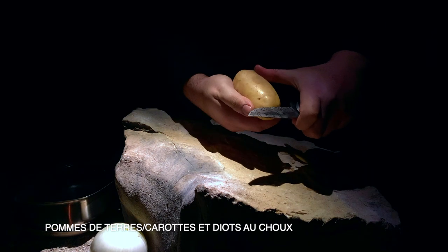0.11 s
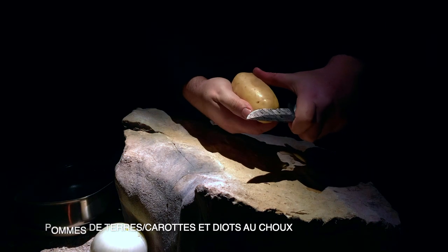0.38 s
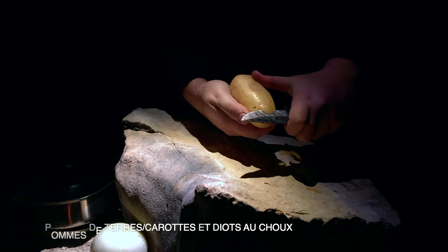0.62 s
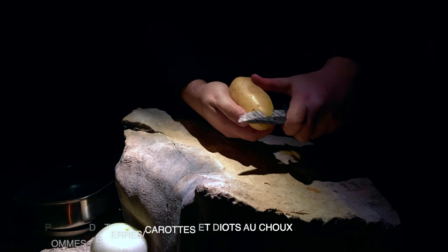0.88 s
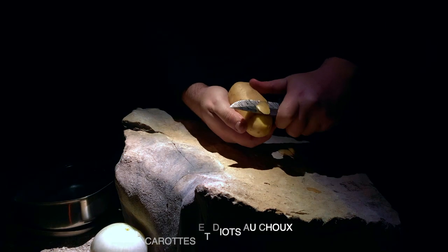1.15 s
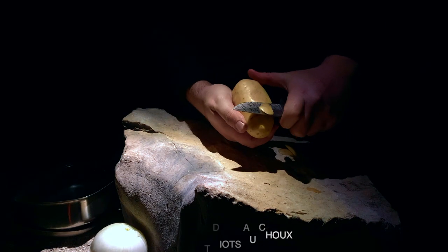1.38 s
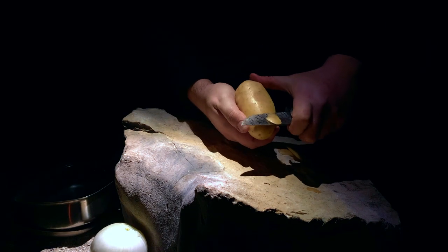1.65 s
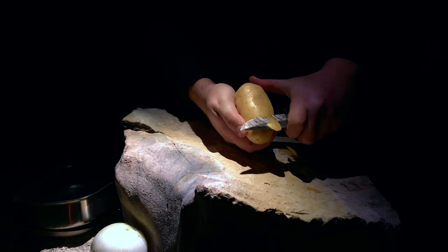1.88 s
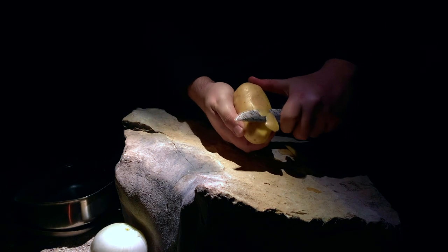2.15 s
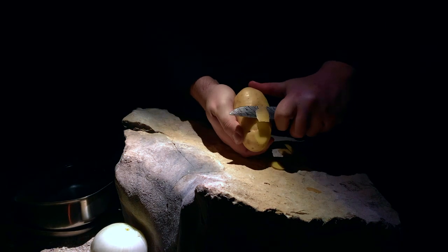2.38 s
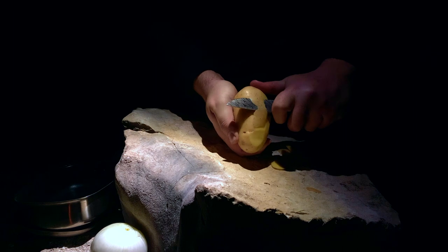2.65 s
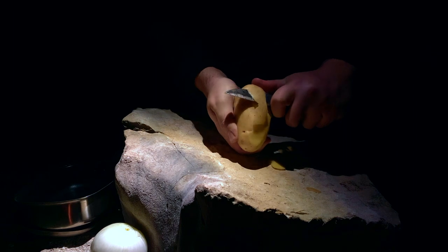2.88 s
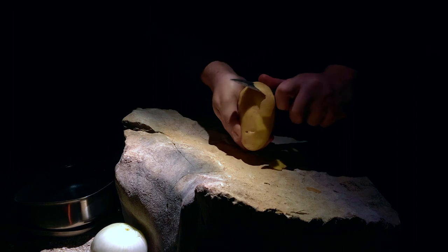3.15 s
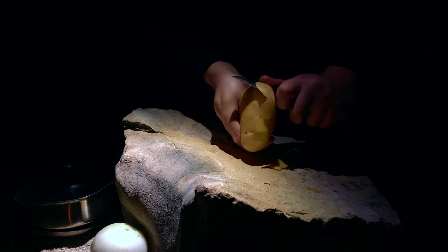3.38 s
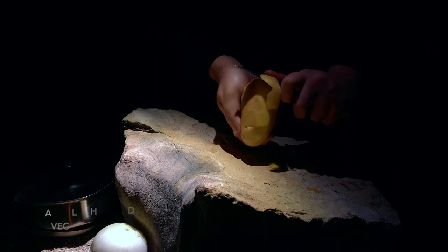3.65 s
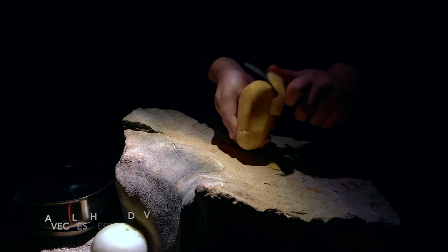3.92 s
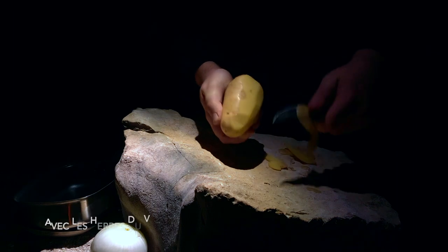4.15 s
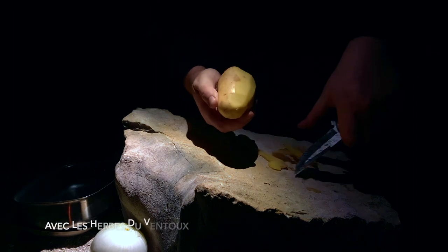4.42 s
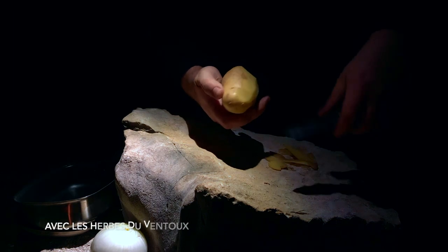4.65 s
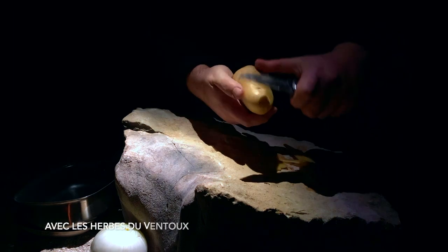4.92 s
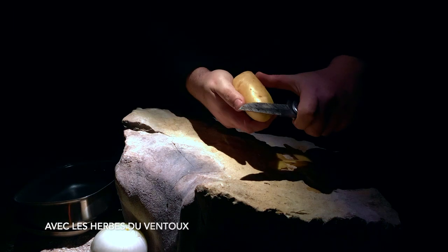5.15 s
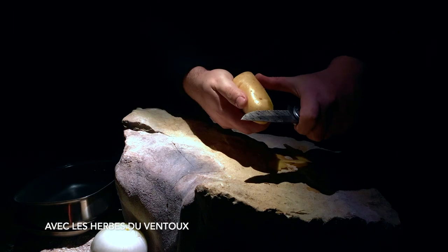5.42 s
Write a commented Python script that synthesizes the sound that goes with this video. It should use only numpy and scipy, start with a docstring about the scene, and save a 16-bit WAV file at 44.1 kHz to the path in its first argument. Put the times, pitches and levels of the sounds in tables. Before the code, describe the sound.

Close outdoor potato peeling: a hard crack at one second, quick stuttering blade scrapes, scattered clicks, low wind buffeting and faint hiss.

```python
"""Peeling a raw potato outdoors

A small knife peels a raw potato: the blade sticks and slips in short wet scrapes, made of tiny ruptures
that ring the knife, potato and hands. Short noise bursts make dry clicks and two sharp snaps, which a
nearby wall throws back. Shaped noise and slow waves make the wind rumbling over the microphone, narrow
noise bands its moans and a faint distant whistle. Gain control dips after the loudest peaks."""
import sys
import numpy as np
from scipy import signal
from scipy.fft import rfft
from scipy.io import wavfile
from scipy.ndimage import uniform_filter1d

SR = 44100
rng = np.random.default_rng(int(sys.argv[2]) if len(sys.argv) > 2 else 0)


def nominal_scale(level):
    """Amplitude ratio for a level in decibels (scalar or array-like)."""
    x = np.asarray(level, float) / 20
    return 10 ** x


def output_pcm(signal):
    """Save a mono or channel-first signal as 16-bit PCM at the path in sys.argv[1].

    Samples are clipped to [-1, 1] before scaling.
    """
    pcm = np.clip(np.atleast_2d(signal).T, -1, 1) * 32767
    wavfile.write(sys.argv[1], SR, np.round(pcm).astype(np.int16))


N = 244314
T = np.arange(N) / SR
HZ = np.fft.rfftfreq(4096, 1 / SR)

# Four pitch ranges from dull to sharp. Each row: lower edge in Hz, upper edge in Hz.
REGISTERS = [(1000, 2800), (2800, 5500), (5500, 10500), (10500, 15500)]
# Resonances of knife, potato and hands. Each row: pitch in Hz, width in Hz, relative strength in dB.
BODY = [(1250, 720, -1.5), (2010, 150, -6.5), (3000, 150, -6.5), (3680, 720, 5.5), (4690, 1100, 1),
        (6640, 290, -17), (7680, 1300, 4.5), (9300, 1200, 3.5), (10600, 2300, -7), (12400, 1300, -12.5),
        (14400, 3000, -13.5)]


def evened(x):
    """Scales a sound to an rms of 1."""
    return x / np.sqrt(np.mean(x ** 2) + 1e-20)


def read(points, hz):
    """Reads a table of (Hz, value) at any frequency, on a logarithmic pitch scale."""
    f, value = np.transpose(points)
    return np.interp(np.log(hz + 1), np.log(f + 1), value)


def curve(rows, t):
    """Draws straight lines in time through each column of a table that starts with seconds."""
    s, *columns = np.transpose(rows)
    return [np.interp(t, s, column) for column in columns]


def add(mix, s, sound):
    """Adds a sound to the mix from second s on."""
    part = mix[round(s * SR):][:len(sound)]
    part += sound[:len(part)]


def noise(field_db, size, patchy_db):
    """Random short-time spectra; field_db(hz, t) gives the level, drifting patches roughen it."""
    hop = size // 4
    hz = np.fft.rfftfreq(size, 1 / SR)
    frames = N // hop + 5
    a, b, patches = rng.standard_normal((frames, len(hz), 3)).T
    patches = uniform_filter1d(patches, size=5, axis=0)
    patches = evened(uniform_filter1d(patches, size=8, axis=1))
    t = np.arange(frames) * hop / SR
    level_db = field_db(hz[:, None], t[None]) + patchy_db * patches
    z = (a + 1j * b) * nominal_scale(level_db)
    return evened(signal.istft(z, nperseg=size, noverlap=size - hop)[1][:N])


def fuzz(count, width_hz):
    """Complex noise around 0 Hz; turning it at some pitch makes a fuzzy band there."""
    white = rng.standard_normal((count, 2)) @ [1, 1j]
    return signal.lfilter([1], [1, -np.exp(-np.pi * width_hz / SR)], white)


def body_gain(hz, grip_db=0):
    """Summed power of the resonances, as a gain; the grip of the hands shifts their strengths."""
    f, width, db = np.transpose(BODY)
    power = nominal_scale(2 * (db + grip_db)) / (1 + (2 * (hz[:, None] - f) / width) ** 2)
    return np.sqrt(power.sum(1))


def colour(x, gain):
    """Filters without ringing ahead of the sound: the phase follows from the log gain."""
    log_gain = np.log(np.maximum(np.r_[gain, gain[-2:0:-1]], 1e-5))
    taps = np.fft.ifft(np.exp(np.conj(signal.hilbert(log_gain)))).real[:1024]
    return signal.oaconvolve(x, taps)


def ring(x, levels_db, seconds, grip_db, push_db, contrast):
    """Rings the body so that each register gets its level; an event also pushes air at low pitch."""
    body = body_gain(HZ, grip_db) ** contrast  # contrast deepens or flattens the resonances
    body = body / (1 + (1120 / (HZ + 1)) ** 6) / (1 + (HZ / 14200) ** 8)
    power = abs(rfft(x, 4096) * body) ** 2
    own_db = [10 * np.log10(power[(HZ > lo) & (HZ < hi)].sum()) for lo, hi in REGISTERS]
    edges = (np.array(REGISTERS) * [1.12, .9]).ravel()  # leaves room for smooth crossings
    lift_db = np.repeat(np.array(levels_db) - own_db, 2)
    gain = body * nominal_scale(read(np.transpose([edges, lift_db]), HZ))
    low = HZ / 240 / (1 + (HZ / 240) ** 2) ** .5 / (1 + (HZ / 430) ** 4)
    gain = gain + nominal_scale(lift_db[0] + push_db) * low
    return colour(x, gain * np.sqrt(len(HZ) * seconds * SR))


def tearing(count, uneven_db):
    """Dense tiny ruptures of cells, of uneven size."""
    return rng.standard_normal(count) * nominal_scale(uneven_db * np.minimum(rng.exponential(1, count), 5))


def breaks(rows, push_db, contrast):
    """A sudden break with a brief rattle rings the body, strongest around its pitch."""
    # How well each register carries from the hands, dull to sharp, in dB.
    path_db = [3, -2, 2, -3]
    out, t = np.zeros(N), np.arange(1024) / SR
    centres = np.sqrt(np.prod(REGISTERS, axis=1))
    for (s, db, hz, fall_db, t60), chance in zip(rows, rng.standard_normal((len(rows), 1024))):
        blow = np.r_[-5.5, chance[1:]]  # the first break is far stronger than the usual rattle
        blow = blow * nominal_scale(-60 * t / max(t60, .002))
        levels_db = db + np.array(path_db) - fall_db * abs(np.log2(centres / hz))
        grip_db = 1.5 * chance[-len(BODY):]
        add(out, s, ring(blow, levels_db, 4 / 1000, grip_db, push_db, contrast))
    return out


def soft_band(s, length, from_hz, to_hz, width_hz, db):
    """A soft fuzzy band that swells, glides and fades."""
    u = np.arange(0, 1, 1 / (length * SR))
    turn = np.exp(2j * np.pi * np.cumsum(from_hz + (to_hz - from_hz) * u) / SR)
    band = evened((fuzz(SR // 2, width_hz)[-len(u):] * turn).real)
    out = np.zeros(N)
    add(out, s, nominal_scale(db) * np.sin(np.pi * u) ** 0.23 * band)
    return out


def wind():
    """A gust drives the roar fully, rumble and deep buffeting less; pressure sways on the diaphragm."""
    # Gusts. Each row: time in seconds, strength in dB.
    gusts = [(0.0, -67.5), (0.31, -67), (0.63, -62.5), (0.88, -65.5), (1.0, -67.5), (1.23, -67.5),
             (1.48, -65), (1.68, -65.5), (2.16, -65), (2.42, -68), (3.8, -60.5), (3.89, -54.5),
             (4.07, -65.5), (4.33, -63.5), (4.78, -64), (5.08, -58), (5.21, -59.5), (5.54, -54.5)]
    # Wind spectrum in calm air. Each row: pitch in Hz, relative level in dB per Hz.
    rumble = [(12, -36), (20, -21), (31, -13.5), (54, -16.5), (138, -13.5), (354, -19.5), (481, -19),
              (597, -32.5), (690, -29.5), (905, -41.5), (1500, -59), (1950, -83.5), (3300, -120)]
    # Slow pressure on the diaphragm. Each row: time in seconds, relative level in dB.
    pressure = [(0.0, -35), (0.59, -45), (1.28, -37), (1.46, -49), (1.85, -35), (2.99, -35), (3.47, -48),
                (3.55, -37), (4.38, -55), (4.46, -44), (5.38, -56), (5.54, -46)]
    calm_db, calm_sway_db = -63, -46  # strengths at which the rumble table holds unchanged
    rumble_follows, deep_follows = 0.55, .15  # share of a gust's dB that the lower layers take on
    sway_leaks = 0.16  # share of the sway's dB that lifts the deep buffeting

    def field(hz, t):
        gust_db = curve(gusts, t)[0] - calm_db
        roar = np.clip((hz - 230) / 150, 0, 1)
        deep = np.clip((80 - hz) / 30, 0, 1)
        share = rumble_follows + (1 - rumble_follows) * roar + (deep_follows - rumble_follows) * deep
        sway_db = curve(pressure, t)[0] - calm_sway_db
        return read(rumble, hz) + share * gust_db + deep * sway_leaks * sway_db

    blowing = nominal_scale(-55.5) * noise(field, size=2048, patchy_db=1.56)
    waves = [np.sin(2 * np.pi * (f * T + rng.random())) / f ** 0.47 for f in np.geomspace(1.2, 9, num=24)]
    sway_db = uniform_filter1d(curve(pressure, T)[0], size=6000) + 1.5
    return blowing + nominal_scale(sway_db) * evened(sum(waves))


def hiss():
    """Steady airy noise with a fixed spectrum."""
    # Each row: pitch in Hz, relative level in dB per Hz.
    spectrum = [(590, -15), (1000, -2.5), (2620, -4.5), (3580, -5), (6110, -8.5), (7880, -7.5),
                (15100, -9.5), (16000, -25)]
    return nominal_scale(-72.5) * noise(lambda hz, t: read(spectrum, hz) + 0 * t, size=512, patchy_db=2.5)


def drag():
    """Faint continuous rubbing of fingers and blade, with tiny ticks of stray fibres giving way."""
    # Each row: time in seconds, relative level in dB.
    strength = [(0.0, -69), (0.26, -72), (0.96, -74.5), (1.19, -84), (1.46, -81), (2.14, -67.5),
                (2.71, -68), (2.85, -63.5), (3.59, -71), (3.73, -86), (4.06, -61), (4.2, -68),
                (4.64, -64.5), (5.25, -65.5), (5.54, -62)]
    rubbing = evened(colour(tearing(N, uneven_db=1.5), body_gain(HZ))[:N])
    sparse = (rng.random(N) < 40 / SR) * tearing(N, uneven_db=4)  # about 40 a second
    bright = nominal_scale(3.7 * np.tanh((HZ - 5700) / 900))
    ticks = evened(colour(sparse, body_gain(HZ) * bright)[:N])
    return nominal_scale(curve(strength, T)[0] - 11.5) * (rubbing + nominal_scale(-8) * ticks)


def clicks():
    """Dry clicks of blade and peel: small breaks that all rattle for the same time."""
    # Each row: start in seconds, level in dB, pitch in Hz, fall in dB per octave away from it.
    rows = [(0.0697, -66, 7130.0, 13), (0.0945, -47, 2830, 21.5), (0.1006, -67, 2700.0, 3),
            (0.1404, -60.5, 5040.0, 7), (0.2267, -65, 14100, 11), (0.2337, -64.5, 9410.0, 17),
            (0.398, -73.1, 7640.0, 8), (0.4526, -60.5, 7640.0, 2.5), (0.4718, -62.5, 4710.0, 4),
            (0.4831, -70.1, 3820.0, 3), (0.59, -75.1, 6210.0, 3), (0.7998, -52.5, 3030, 7.5),
            (0.9523, -54.5, 2450, 7.5), (0.9797, -75, 2190.0, 0), (1.289, -59.5, 2190.0, 4.5),
            (1.3732, -59, 5400.0, 9), (1.396, -62, 4710.0, 16), (1.4338, -57.5, 3200, 10),
            (1.5128, -68.5, 10810.0, 2.5), (1.5795, -63, 8190.0, 5.5), (1.8363, -58, 5790.0, 10),
            (1.9113, -71, 12420.0, 3), (2.0505, -50, 2900.0, 16.5), (2.0835, -56.2, 4710.0, 15),
            (2.0997, -62.9, 9410.0, 12), (2.1787, -70, 6650.0, 11), (2.2177, -52, 6650.0, 6.5),
            (2.2442, -79, 1910.0, 4), (2.2671, -65, 10810.0, 12), (2.7015, -50, 2900.0, 22),
            (2.7084, -59, 5790.0, 8), (2.7259, -54.5, 3570.0, 10), (2.9146, -62.5, 5400.0, 12),
            (3.0115, -62, 4710.0, 11), (3.058, -64, 5400.0, 10), (3.0724, -59, 4390.0, 16),
            (3.1076, -67, 10090.0, 10), (3.1125, -58.5, 6250, 10), (3.197, -74.9, 14260.0, 8),
            (3.3143, -71, 9500, 8), (3.38, -66.1, 7640.0, 14.5), (3.3907, -56, 8100, 16),
            (3.419, -64.5, 7640.0, 15), (3.46, -67.5, 7640.0, 11), (3.488, -65, 1910.0, 11),
            (3.5318, -60.5, 8190.0, 21), (3.598, -69, 8100, 10), (3.6157, -70, 8700, 9),
            (3.6623, -53.3, 8190.0, 5), (3.6793, -56, 6600, 12), (3.848, -61.5, 8780.0, 4),
            (3.9728, -57.5, 8190.0, 7), (4.0629, -67, 7130.0, 8), (4.1001, -65.5, 8780.0, 5),
            (4.1402, -53, 4180, 14), (4.1633, -45, 10300, 7.5), (4.2124, -59, 10900, 18),
            (4.235, -64, 2050.0, 15), (4.2803, -60, 7700, 6), (4.3366, -58.5, 4100.0, 7),
            (4.3814, -70, 8190.0, 3), (4.7943, -71, 7640.0, 10.5), (5.1422, -63, 1780.0, 3),
            (5.2456, -64, 8780.0, 4), (5.2572, -56.5, 4390.0, 7.5), (5.2696, -49.5, 4360, 15),
            (5.3258, -63.5, 5790.0, 4.5), (5.4085, -68, 14260.0, 4)]
    t60 = 0.012  # seconds for the rattle to fall by 60 dB
    return breaks([(*row, t60) for row in rows], push_db=11.0, contrast=1.05)


def surroundings(x):
    """Scattered returns from stones and a wall, over a diffuse tail that decays by pitch."""
    # Reflections. Each row: delay in ms, relative level in dB, spread in ms.
    echoes = [(1.2, -13, .8), (4, -16, 3), (13.6, -27, .6), (19, -23, 4), (49.2, -22, .4), (52, -29, 2.5),
              (63, -37, 6), (83.2, -39, .8), (98.6, -38, .5)]
    # Diffuse decay. Each row: pitch in Hz, time to fall by 60 dB in seconds.
    decay = [(300, 0.27), (1500, 0.14), (3500, .2), (8000, 0.24), (14000, .09)]
    ms = np.arange(SR // 3) * 1000 / SR
    shape = 0 * ms
    for delay, db, spread in echoes:
        fading = (ms > delay) * np.exp(-abs(ms - delay) / spread)
        shape = shape + nominal_scale(db) * fading / np.sqrt(spread * SR / 2000)
    returns = signal.lfilter([1, -.45], 1, rng.standard_normal(len(ms)) * shape)  # less bass comes back
    hz, t, z = signal.stft(rng.standard_normal(len(ms)), SR, nperseg=128)
    z = z * nominal_scale(-45.5 - 60 * t / read(decay, hz)[:, None])
    tail = signal.istft(z, SR, nperseg=128)[1][:len(ms)]
    return signal.oaconvolve(x, nominal_scale(2.5) * returns + tail * (ms > 3))[:N]


def slips():
    """Each slip is a short swell of ruptures ringing the body: dull from flesh, bright from the blade."""
    # Each row: time in seconds, nominal length in ms, flesh level in dB, blade level in dB,
    # keenness (the blade's share of the top register) in dB.
    rows = [(0.319, 12.0, -68.5, -64, -23), (0.449, 6.6, -68.5, -57.5, -13), (0.518, 12, -68.5, -63, -8),
            (0.556, 12.0, -72.5, -68, -13), (0.719, 18.0, -73.0, -68, -3), (0.881, 18.5, -72.0, -62, -14),
            (0.905, 11, -72, -69, -5), (1.225, 23, -76.5, -77, -14.5), (1.831, 14, -67.5, -64.5, -3),
            (1.883, 12, -73.5, -65.0, -3), (1.931, 12.0, -72.0, -65.5, 1), (1.992, 12, -72, -65.5, 2),
            (2.058, 11.0, -70, -60.5, 0), (2.154, 37, -67.5, -60.5, -4), (2.275, 20.0, -63.0, -59.5, -3),
            (2.403, 15.0, -62.5, -60, -4), (2.454, 9, -63.5, -60.5, -1), (2.499, 9, -65.5, -63, -1),
            (2.551, 11, -67.5, -63, 1), (2.604, 9.2, -65.5, -59.5, -6), (2.667, 12.0, -64, -56.5, -2),
            (2.764, 9.0, -66.5, -55.5, -6), (2.829, 13, -69.5, -51.0, -4.5), (2.878, 12.0, -92, -69.0, -3),
            (2.933, 10, -78.0, -67, -13), (2.944, 22.0, -70.5, -56, -11), (2.979, 21, -69.0, -57.5, -13),
            (3.18, 19, -90, -65, -4), (3.202, 39, -67.5, -58.5, -2), (3.254, 16, -88, -69.5, -8),
            (3.35, 7.4, -76, -73, -16), (3.505, 13.0, -96, -70.5, -16), (3.623, 36, -89, -66, -5),
            (3.651, 21.0, -75.5, -56.5, -6), (3.675, 45, -74.5, -62, -10), (3.712, 27, -68.5, -58, -2),
            (3.765, 21, -85, -75.5, 1), (4.012, 10.0, -71.5, -68, -16), (4.047, 53.0, -79, -83, -11),
            (4.292, 12.0, -68, -63, -14), (4.345, 12.0, -66, -59.5, -16), (4.365, 12.0, -75, -73.0, -11),
            (4.409, 4.6, -66.5, -58, -8), (4.51, 9.7, -66.0, -58, -17), (4.662, 23, -89, -73.5, -8),
            (4.803, 50, -78.5, -76, -13.5)]
    # What flesh adds to the four registers, and the blade to the lower three, in dB.
    flesh_shape = [1, 1.5, -28, -14]
    blade_shape = [-37, -17.5, -0.5]
    out, grains = np.zeros(N), tearing(N, uneven_db=3.5)
    grips = rng.standard_normal((len(rows), len(BODY)))
    for (s, ms, flesh_db, blade_db, keen_db), grip in zip(rows, grips):
        n = round(1.38 * ms * SR / 1000)  # room for the soft ends
        burst = grains[round(s * SR):][:n] * signal.windows.tukey(n, .65)
        flesh = nominal_scale(flesh_db + np.array(flesh_shape))
        blade = nominal_scale(blade_db + np.r_[blade_shape, keen_db])
        levels_db = 10 * np.log10(flesh ** 2 + blade ** 2)
        sound = ring(burst, levels_db, ms / 1000, 5.6 * grip, push_db=-36, contrast=1.9)
        add(out, s - 0.083 * ms / 1000, sound)
    return out


def snaps():
    """Two hard breaks with flattened resonances."""
    # Each row: start in seconds, level in dB, pitch in Hz, fall in dB per octave away from it,
    # time for the rattle to fall by 60 dB in seconds (values under 0.002 count as 0.002).
    rows = [(0.747, -42, 7600, 1.5, 0.0014), (1.0148, -17.5, 3645, 5.5, 0.0069)]
    return breaks(rows, push_db=0, contrast=.7)


def whistle():
    """A thin wavering distant tone that sinks slowly, inside a wider airy band."""
    # Each row: time in seconds, pitch in Hz, level in dB.
    path = [(1.56, 3120, -100), (1.6, 3110, -82.5), (1.75, 3073, -75.5), (1.85, 2965, -80.5),
            (2.1, 3000, -74), (2.6, 3000, -80), (2.95, 2938, -81), (3.3, 2970, -88), (3.45, 2870, -100)]
    hz, db = curve(path, T)
    thin, airy = fuzz(N, 45), fuzz(N, 600)
    turn = np.exp(2j * np.pi * np.cumsum(hz) / SR)
    return nominal_scale(db) * evened(((thin + nominal_scale(9.5) * airy) * turn).real)


def moans():
    """The wind moans at edges near the microphone: fuzzy bands at fixed pitches."""
    # Each row: start in seconds, length in seconds, pitch in Hz, level in dB.
    rows = [(2.08, 0.28, 250.7, -56.5), (2.15, 0.14, 442, -73), (2.6, 0.18, 281.3, -58),
            (2.7, 0.21, 438.6, -64), (3.36, .25, 187.5, -66.5), (3.38, 0.19, 460, -64),
            (3.402, .2, 700, -75), (3.76, .28, 457.5, -65), (3.759, 0.13, 638, -71.5),
            (4.99, .22, 426.6, -59.5), (5.1, 0.17, 199.2, -56.5), (5.32, 0.26, 212.6, -58.5)]
    width = .17  # as a share of the pitch
    return sum(soft_band(s, length, hz, hz, width * hz, db) for s, length, hz, db in rows)


def swish():
    """Peel slides off the blade: one fuzzy band gliding down."""
    # Start in seconds, length in seconds, first pitch in Hz, last pitch in Hz, width in Hz, level in dB.
    glide = (4.025, .1, 3500, 2800, 350, -75)
    return soft_band(*glide)


def scene():
    """Adds the knife work, two farther-off snaps and their reflections to the wind, whistle and hiss."""
    snapping, clicking = snaps(), clicks()
    # the snaps excite the surroundings far more than the clicks do
    reflected = surroundings(snapping + nominal_scale(-10.5) * clicking)
    events = snapping + clicking + reflected + slips() + drag() + swish()
    return (events + wind() + moans() + whistle() + hiss())[None]


def gain_control(x):
    """The level falls just after a loud peak and creeps back."""
    above_sway = x[0] - uniform_filter1d(x[0], size=800)
    power_db = 10 * np.log10(uniform_filter1d(above_sway ** 2, size=200) + 1e-12)
    fall = T * 16.0  # the held peak sinks this many dB a second
    held_db = np.maximum.accumulate(power_db + fall) - fall
    over_db = np.maximum(held_db + 27.5, 0)
    cut_db = signal.lfilter([1 / 1500], [1, 1 / 1500 - 1], 0.65 * over_db)  # takes hold over tens of ms
    return x * nominal_scale(-cut_db)


def overload(x):
    """The preamplifier rounds off the highest peaks."""
    ceiling = .3  # full scale is 1
    return x / (1 + (x / ceiling) ** 4) ** .25


def roll_off(x):
    """The treble ends steeply here."""
    return signal.sosfilt(signal.butter(12, 16520, fs=SR, output="sos"), x)


def record(dry):
    """Gain control rides the level, then soft overload rounds the peaks."""
    finished = overload(gain_control(dry))
    return roll_off(finished)


dry = scene()
out = record(dry)
output_pcm(out)
```